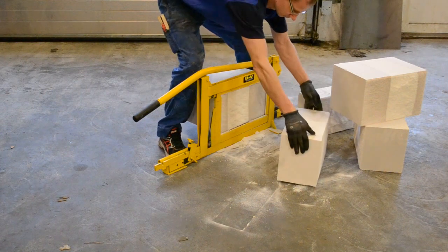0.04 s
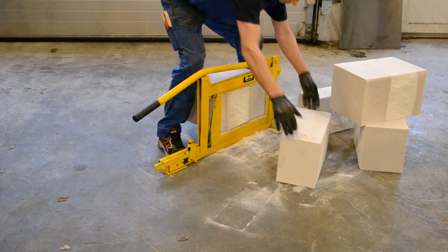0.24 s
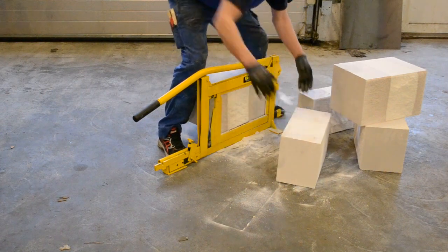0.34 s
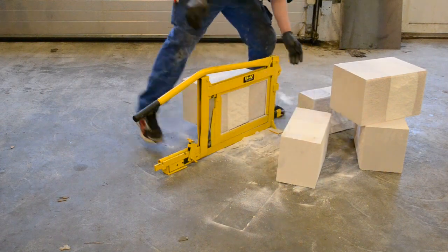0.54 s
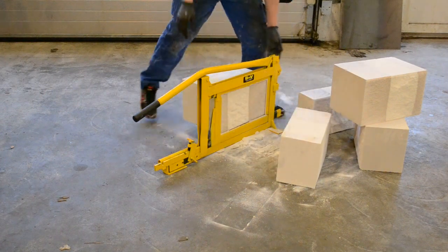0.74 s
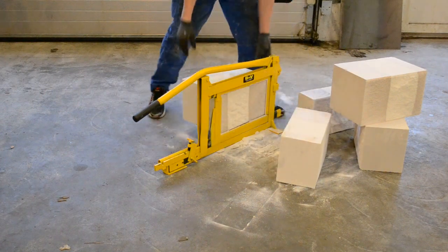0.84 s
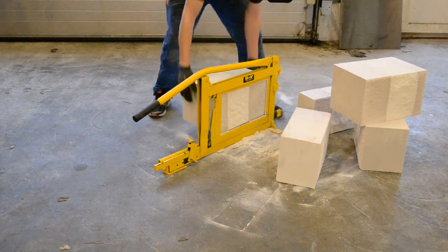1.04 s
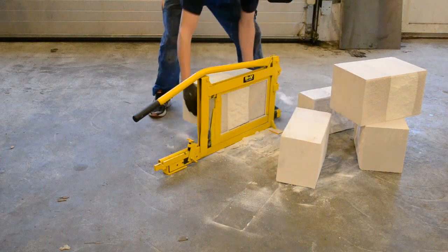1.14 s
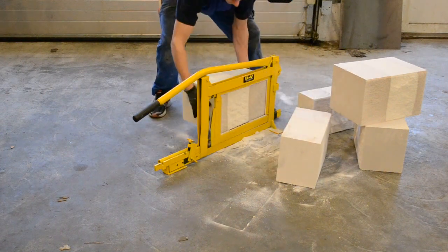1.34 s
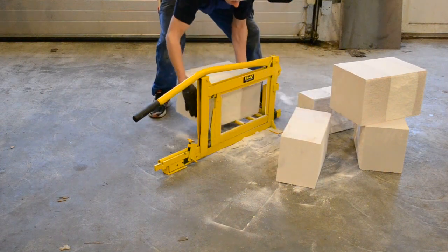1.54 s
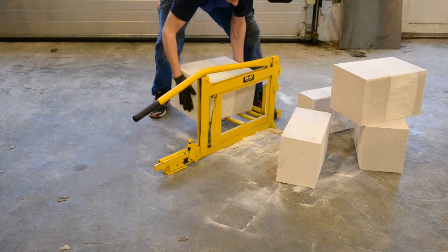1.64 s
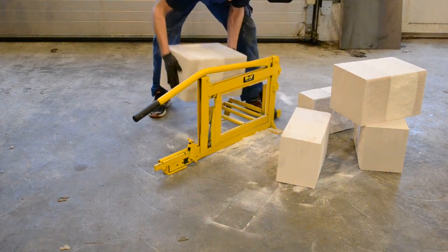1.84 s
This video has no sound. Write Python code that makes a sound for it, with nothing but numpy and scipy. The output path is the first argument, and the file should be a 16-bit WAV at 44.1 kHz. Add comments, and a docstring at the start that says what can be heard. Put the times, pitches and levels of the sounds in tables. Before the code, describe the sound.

One stony knock rings out near the microphone as a building block is set down on gritty concrete. Quieter shoe scuffs, a sharp click and soft scraping follow, with short echoes off hard workshop walls.

```python
"""A light building block, tipped upright on a dusty concrete floor, lands with a ringing, stony knock
as grit crunches under its edge. A work shoe scuffs off, comes down with a sharp click and slides;
gloves and a second block rub on a steel cutter frame. Heard on one microphone in a hard-walled
workshop: the ring sounds close, while the smaller sounds carry more echo, over a faint steady hiss."""
import sys
import numpy as np
from scipy import signal
from scipy.fft import rfft, irfft
from scipy.io import wavfile

SR = 44100
rng = np.random.default_rng(int(sys.argv[2]) if len(sys.argv) > 2 else 0)


def bounce(signal):
    """Save signal as a 16-bit WAV file at the path given by the first command-line argument."""
    frames = np.transpose(np.atleast_2d(signal))
    limited = np.clip(frames, -1, 1)
    pcm = np.round(limited * 32767).astype(np.int16)
    wavfile.write(sys.argv[1], SR, pcm)


N = 83790
TOP_HZ = 11000  # upper edge of the microphone channel


# the block's modes (f/Hz, relative level/dB, t60/s)
BLOCK_MODES = [(177, -31.5, 0.28), (249, -21, 0.17), (301.3, -21.5, 0.39), (338, -9, 0.12),
               (384.5, -19, 0.32), (435, -16.5, 0.32), (484, -16, 0.37), (588.5, -15, 0.29),
               (732.7, -11, 0.42), (755, -16, 0.65), (794, -12.5, 0.46), (925, -26, 0.15), (990, -19, 0.5),
               (1024.5, -6, 0.58), (1093.4, -.5, 0.36), (1081, -3.5, 0.094), (1120, -9, .52),
               (1125, -14.5, 0.81), (1243, -30, 0.26), (1651, -22, 0.53), (1662, -28.5, 0.68),
               (1873, -31.5, 0.53), (1981, -29.5, 0.25), (2364, -31.5, 0.13), (2720, -19, 0.12)]
# block meets floor (t/s, relative level/dB)
LANDINGS = [(0.2059, -16.5), (0.2088, 0.5)]

def block_ring(level_db=-19.5, contact_s=0.0015, radiation_hz=133):
    """The landing sets close pairs of modes beating; dust softens the contact."""
    ring = 0
    for at, hit_db in LANDINGS:
        age = np.maximum(np.arange(N) / SR - at, 0)
        modes = sum(undb(db) * fade(at, t60) * np.sin(2 * np.pi * hz * age)
                    for hz, db, t60 in BLOCK_MODES)
        ring = ring + undb(hit_db) * (1 - np.exp(-age / contact_s)) * modes
    bass_cut = signal.butter(2, radiation_hz, "high", fs=SR, output="sos")  # too small to radiate bass
    return undb(level_db) * signal.sosfilt(bass_cut, ring)


# the edge, then the face, comes down (t/s, level/dB)
THUDS = [(0.2099, -1.5), (0.2221, -15.5), (0.2323, -14.5)]
# dull body of the knock (f/Hz, relative level/dB)
THUD_COLOUR = [(40, -47), (100, -25.5), (190, -13), (330, -7), (490, -5.5), (620, -9), (850, -6),
               (1100, -2), (1350, -18.5), (2700, -25), (4200, -35), (6000, -42), (10000, -57)]

def block_thud():
    """Each contact with the floor is one heavily damped push."""
    pushes = sum(undb(db) * np.maximum(1 - np.abs(np.arange(N) - at * SR), 0) for at, db in THUDS)
    return colour(pushes, THUD_COLOUR)


# grit under the landing block (t/s, level/dB, t60/s)
CRUSHES = [(.2088, -36, 0.031), (.219, -45.5, 0.13)]
# midrange crunch (f/Hz, relative level/dB)
CRUSH_COLOUR = [(300, -21), (1500, 2), (2700, -2), (4100, -5.5), (5500, -13.5), (10000, -19.5)]

def grit_crush():
    """The block crushes grit against the floor."""
    return bursts(CRUSHES, CRUSH_COLOUR)


# the shoe comes down (t/s, level/dB)
CLICKS = [(0.839, -25.5), (0.8406, -26.5), (0.8432, -28), (0.8457, -35), (.851, -29.5), (0.8558, -37.5),
          (0.856, -33.5), (0.8614, -34.5)]
# bright snap (f/Hz, relative level/dB)
CLICK_COLOUR = [(150, -23.5), (700, -6), (1300, -9), (2200, -7), (3400, -6), (4200, 0.5), (4700, 1),
                (5600, -2), (7600, -9.5), (8700, -1.5), (9700, -2.5), (11000, -20)]

def shoe_clicks(t60_s=0.0056):
    """Sole and grit strike concrete in a tight cluster."""
    return bursts([(at, db, t60_s) for at, db in CLICKS], CLICK_COLOUR)


# single grains on the floor (t/s, level/dB, t60/s)
CRACKS = [(.0848, -40, 0.037), (.122, -48.5, 0.036), (.127, -45.5, 0.039), (.1485, -59, 0.0073),
          (.161, -61, .008), (.3017, -44, 0.0088), (.3935, -47, 0.0053), (.417, -31.5, 0.0046),
          (.4695, -41, 0.0046), (.9035, -40, 0.0056), (.9228, -34.5, .005), (1.149, -43, 0.0039),
          (1.226, -42, 0.017)]
# thin tick (f/Hz, relative level/dB)
CRACK_COLOUR = [(100, -43), (500, -17), (2500, -10), (3800, -3.5), (5500, -0.5), (7600, -11), (8500, -6),
                (11000, -20.5)]

def grain_cracks():
    """Each grain cracks with one short burst."""
    return bursts(CRACKS, CRACK_COLOUR)


# heavy slides (peak t/s, rise/s, fall/s, level/dB)
SLIDES = [(.993, 0.065, 0.043, -39.5), (1.23, 0.03, 0.037, -47.5)]
# midrange scrape (f/Hz, relative level/dB)
SLIDE_COLOUR = [(120, -35.5), (400, -12.5), (700, -3), (980, 1), (1500, -2.5), (2400, -4.5), (3100, -7.5),
                (4400, -7), (6500, -14.5), (7900, -22), (9200, -17), (11000, -30)]

def slides():
    """Sole and block drag over dusty concrete."""
    return rub(SLIDES, SLIDE_COLOUR, grit=1.4, spread_db=1.5)


# light scuffs (peak t/s, rise/s, fall/s, level/dB)
SCUFFS = [(.02, 0.06, 0.042, -55), (.18, 0.045, 0.019, -49.5), (.425, 0.025, 0.054, -46.5),
          (.47, 0.031, 0.039, -49.5), (.945, 0.017, 0.024, -45)]
# sandy rustle (f/Hz, relative level/dB)
SCUFF_COLOUR = [(150, -19), (700, -2.5), (1600, -1), (2400, -2.5), (4800, -4), (6500, -11), (7900, -17.5),
                (9200, -12), (11000, -27.5)]

def sole_scuffs():
    """The sole skims loose grit."""
    return rub(SCUFFS, SCUFF_COLOUR, grit=1.08, spread_db=2.5)


# edges on floor and frame (peak t/s, rise/s, fall/s, level/dB, f/Hz)
GRINDS = [(.01, 0.024, 0.012, -58.5, 776), (.09, 0.026, 0.027, -53, 774), (1.195, 0.058, 0.022, -57, 794),
          (1.43, 0.02, .025, -65.5, 3470), (1.503, 0.017, 0.012, -55.5, 2730),
          (1.54, 0.044, .04, -62.5, 3690)]

def edge_grind(q=14):
    """The blocks sing faintly: each grinding edge excites one broad resonance."""
    out = 0
    for *stroke, hz in GRINDS:
        b, a = signal.iirpeak(hz, q, fs=SR)
        resonance = signal.lfilter(b, a, signal.lfilter(b, a, rng.standard_normal(N)))
        out = out + pressure([stroke]) * unit(resonance)
    return out


# glove strokes (peak t/s, rise/s, fall/s, level/dB)
BRUSHES = [(.005, .03, 0.044, -57.5), (.105, 0.04, 0.039, -55), (1.155, 0.024, 0.068, -54),
           (1.2, 0.072, 0.063, -58.5), (1.42, 0.017, 0.032, -61.5), (1.56, 0.089, 0.033, -62.5)]
# airy swish (f/Hz, relative level/dB)
BRUSH_COLOUR = [(300, -4.5), (800, -4), (2000, 2), (5500, 2.5), (7800, -3), (9300, 4), (11000, -17.5)]

def glove_brushes():
    """Gloves brush the block with fine, even friction."""
    return rub(BRUSHES, BRUSH_COLOUR, grit=0.79, spread_db=-1.5)


# strokes at the cutter frame (peak t/s, rise/s, fall/s, level/dB)
RASPS = [(1.38, 0.059, 0.17, -61.5), (1.507, 0.022, 0.02, -54), (1.572, 0.044, .035, -56.5),
         (1.7, 0.13, 0.2, -65)]
# dry rasp (f/Hz, relative level/dB)
RASP_COLOUR = [(200, -8), (1000, 1.5), (2200, 0.5), (2700, 2.5), (3200, -1.5), (3800, -1), (5000, -3.5),
               (10000, -16)]

def frame_rasps():
    """The second block rubs on steel in coarse, uneven slips."""
    return rub(RASPS, RASP_COLOUR, grit=1.0, spread_db=5)


# reverberation between the hard walls (f/Hz, t60/s)
ROOM_T60 = [(150, 0.45), (500, 0.43), (1200, 0.73), (4000, .48), (10000, 0.41)]

def workshop_echo(build_s=0.004, early_db=-5, early_s=0.0067):
    """Diffuse echo at the microphone, unit energy; the midrange lingers longest."""
    t, hz = np.arange(N) / SR, np.fft.rfftfreq(N, 1 / SR)
    noise = rfft(rng.standard_normal(N))
    centres = np.geomspace(100, 12800, 8)
    tail = 0
    for centre, pick in zip(centres, np.eye(len(centres))):
        band = irfft(noise * along(list(zip(centres, pick)), hz), N)
        tail = tail + band * fade(0, along(ROOM_T60, centre))
    early = 1 + undb(early_db) * np.exp(-(t / early_s) ** 2)  # off the floor and near objects
    tail = tail * (1 - np.exp(-t / build_s)) * early
    return tail / np.sqrt(np.sum(tail ** 2))


# workshop room tone (f/Hz, relative level/dB)
HISS = [(15, -39), (25, -21), (145, -10.5), (182, -9), (303, -3), (336, -7), (412, -3), (545, -8.5),
        (603, -5), (954, -8), (2930, -12), (9200, -27), (11000, -40.5), (14300, -62), (22000, -120)]

def room_tone(level_db=-62.5):
    """A faint steady hiss lies behind everything."""
    spectrum = rfft(rng.standard_normal(N)) * undb(along(HISS, np.fft.rfftfreq(N, 1 / SR)))
    return undb(level_db) * unit(irfft(spectrum, N))


def bursts(rows, spectrum):
    """Brief noisy contacts sharing one spectrum."""
    envelope = sum(undb(db) * fade(at, t60) for at, db, t60 in rows)
    return colour(envelope * rng.standard_normal(N), spectrum)


def rub(rows, spectrum, grit, spread_db, grains_per_s=5000):
    """Friction: a smooth hiss and many tiny grain slips, both following the pressure."""
    slips = (rng.random(N) < grains_per_s / SR) * rng.choice([-1, 1], N)
    sizes = undb(spread_db * np.minimum(rng.exponential(size=N), 5))
    friction = unit(rng.standard_normal(N) + grit * unit(slips * sizes))
    return colour(pressure(rows) * friction, spectrum)


def pressure(rows):
    """Each rubbing stroke swells to its peak and eases off; overlaps add in power."""
    t = np.arange(N) / SR
    swells = (undb(db) * np.exp(-((t - at) / np.where(t < at, rise, fall)) ** 2)
              for at, rise, fall, db in rows)
    return np.sqrt(sum(swell ** 2 for swell in swells))


def fade(start, t60):
    """Envelope that jumps to 1 and dies away."""
    age = np.arange(N) / SR - start
    return (age >= 0) * np.exp(-np.log(1000) * np.maximum(age, 0) / t60)


def colour(x, spectrum, size=2048):
    """Causal filter of unit power gain: the given spectrum, rolled off above TOP_HZ."""
    hz = np.fft.rfftfreq(size, 1 / SR)
    gain = unit(undb(along(spectrum, hz)) / np.sqrt(1 + (hz / TOP_HZ) ** 20))
    cepstrum = irfft(np.log(gain))
    cepstrum[1:size // 2] *= 2  # fold to minimum phase
    cepstrum[size // 2 + 1:] = 0
    return signal.fftconvolve(x, irfft(np.exp(rfft(cepstrum))))[:N]


def along(points, hz):
    """Read (f/Hz, value) points on a log-frequency axis."""
    freqs, values = np.array(points, float).T
    return np.interp(np.log(np.maximum(hz, 1)), np.log(freqs), values)


def undb(db):
    """Decibels to gain."""
    return 10 ** (np.asarray(db) / 20)


def unit(x):
    """Scale to rms 1."""
    return x / np.sqrt(np.mean(x ** 2))


def scene():
    """Each source reaches the microphone directly and again off the workshop walls."""
    room = workshop_echo()

    def at_mic(direct, echo_db):
        return direct + undb(echo_db) * signal.fftconvolve(direct, room)[:N]

    knock = at_mic(block_ring(), echo_db=-15.5) + at_mic(block_thud(), echo_db=1)
    step = at_mic(shoe_clicks(), echo_db=-3)
    grit = at_mic(grain_cracks(), echo_db=-5) + at_mic(grit_crush(), echo_db=-4.5)
    rubbing = sole_scuffs() + slides() + glove_brushes() + frame_rasps() + edge_grind()
    return (knock + step + grit + at_mic(rubbing, echo_db=-6.5) + room_tone())[None]


def record(dry):
    """The microphone channel cuts off steeply above TOP_HZ."""
    return signal.sosfilt(signal.ellip(8, .2, 80, TOP_HZ, fs=SR, output="sos"), dry)


dry = scene()
out = record(dry)
bounce(out)
```